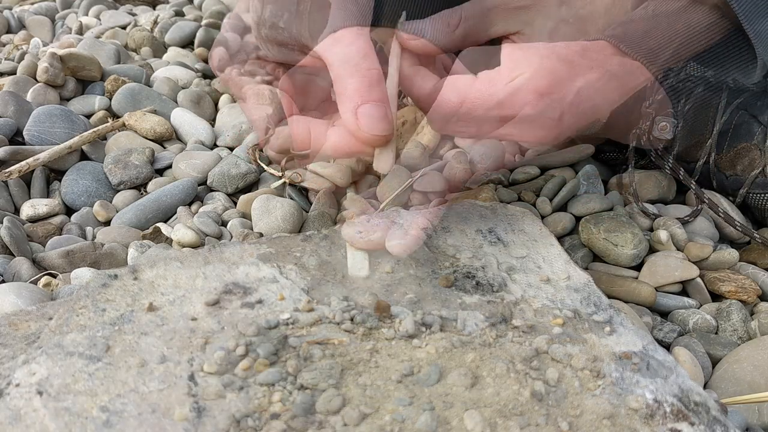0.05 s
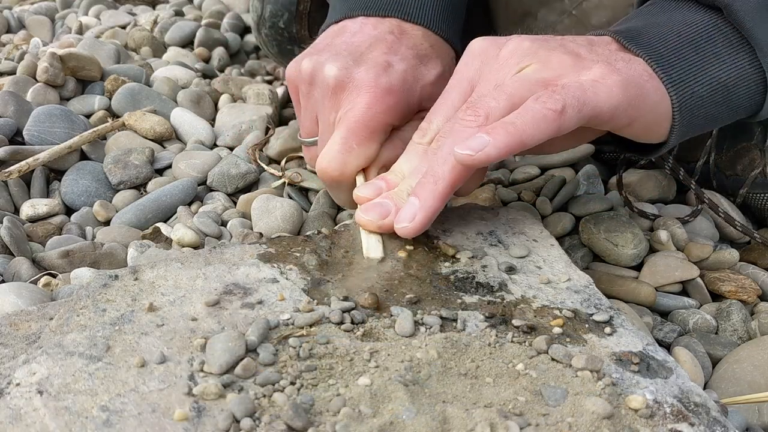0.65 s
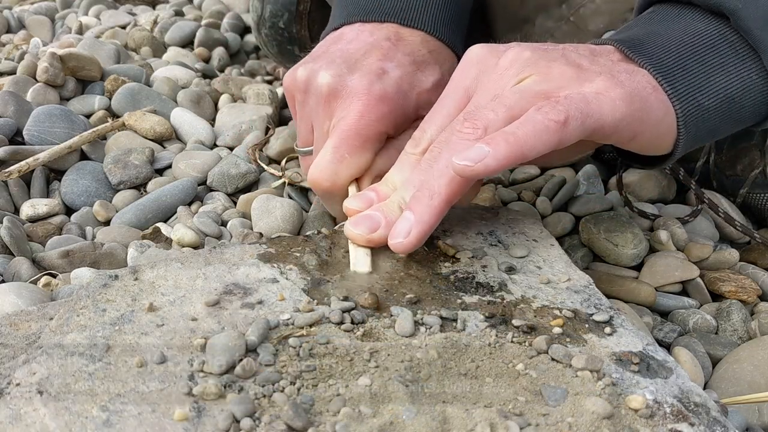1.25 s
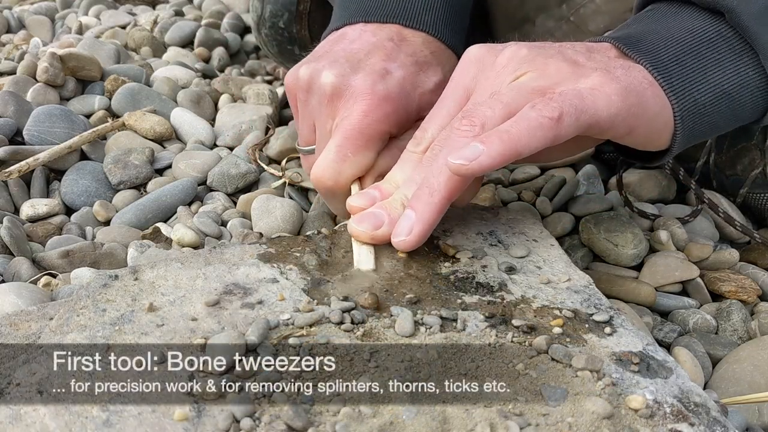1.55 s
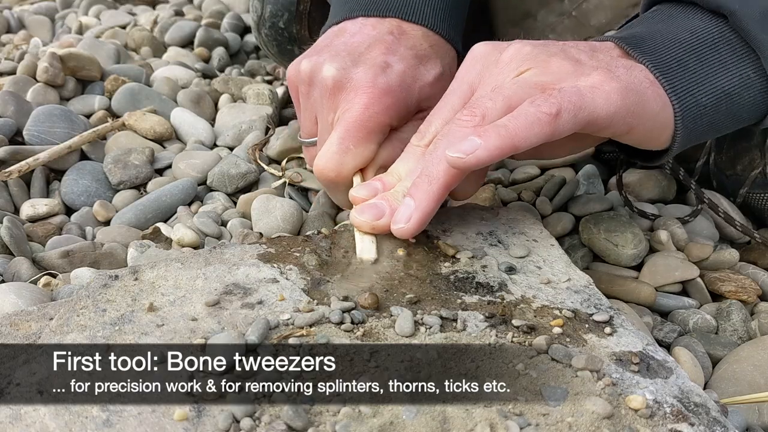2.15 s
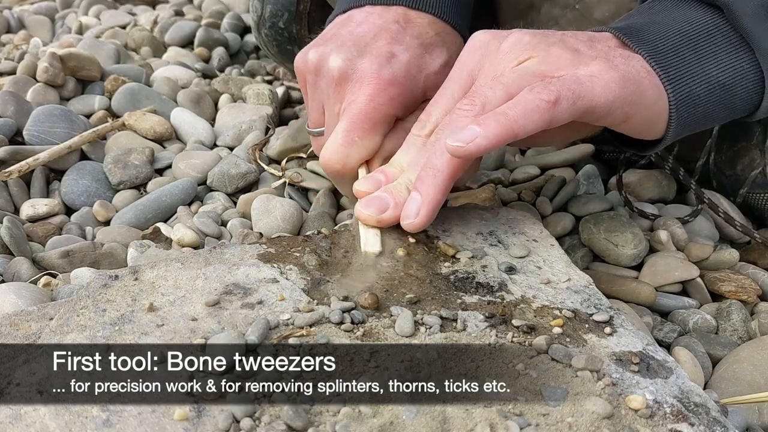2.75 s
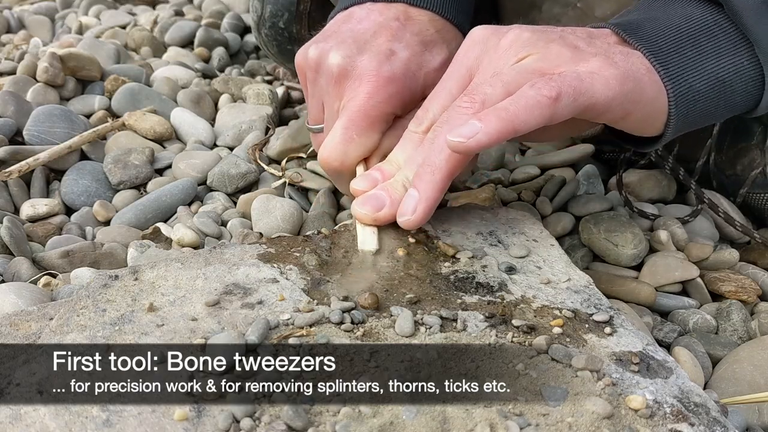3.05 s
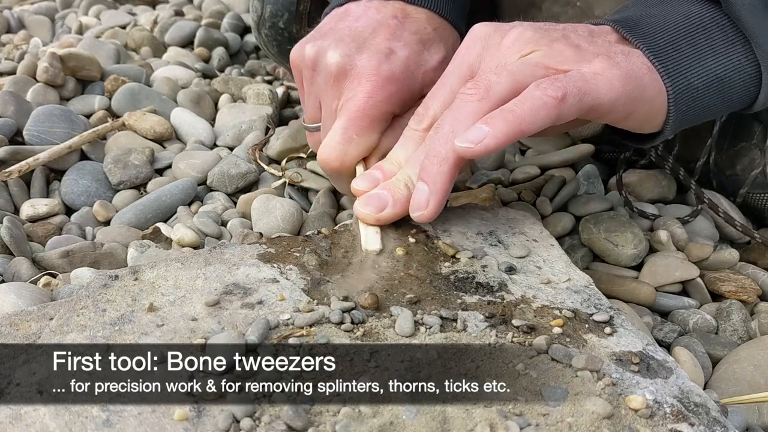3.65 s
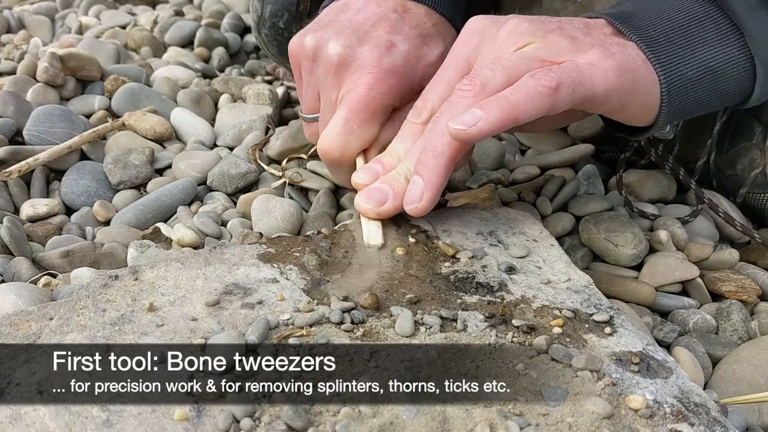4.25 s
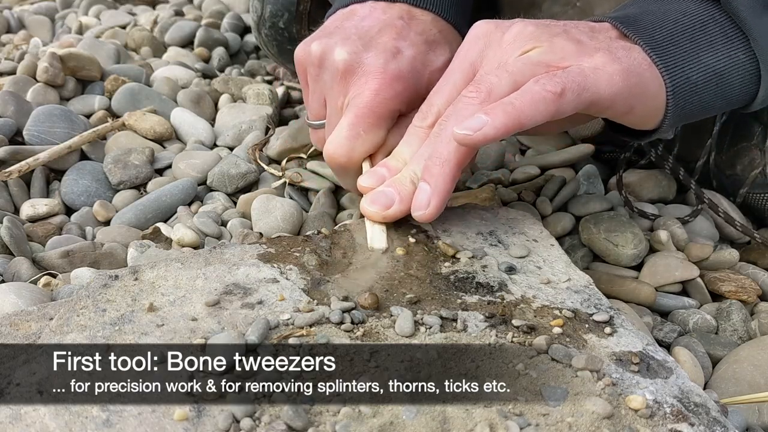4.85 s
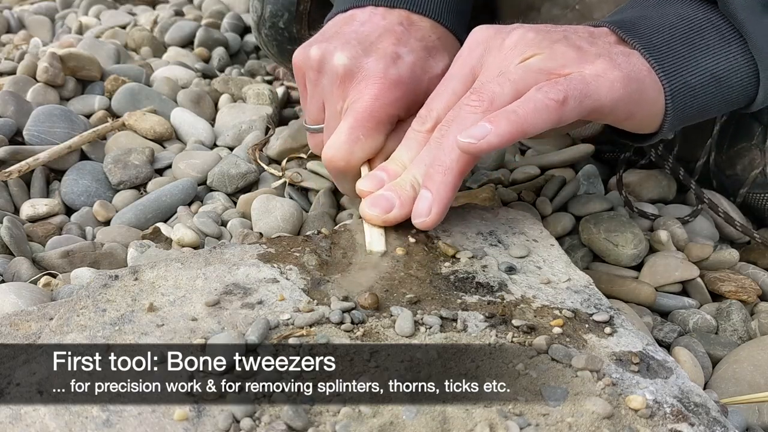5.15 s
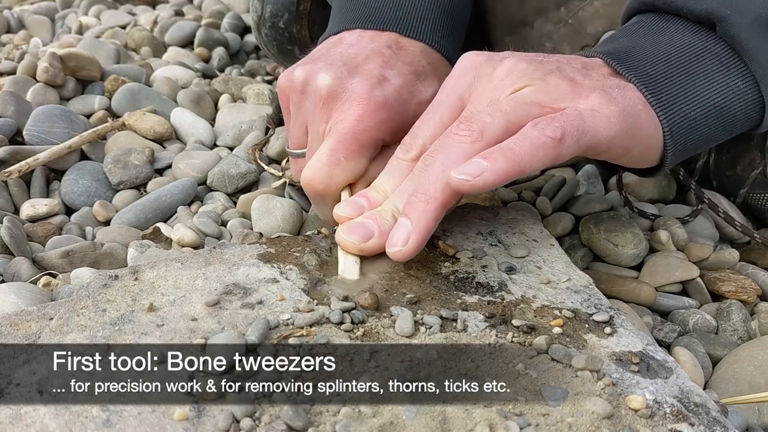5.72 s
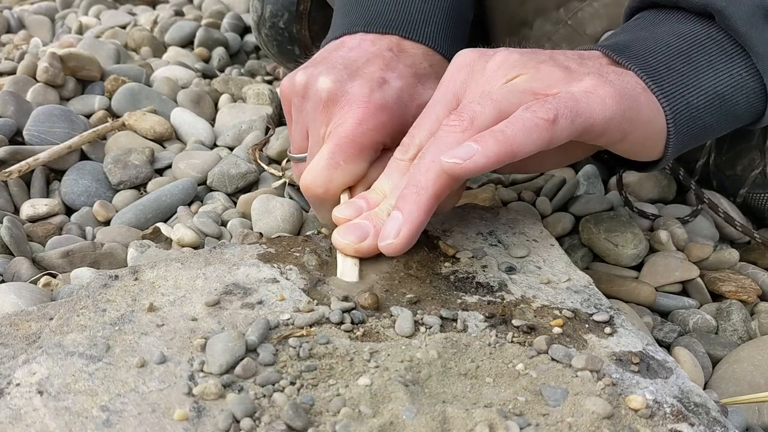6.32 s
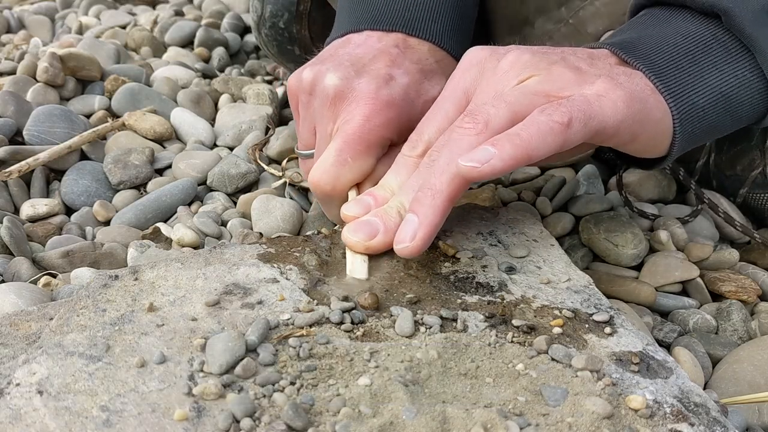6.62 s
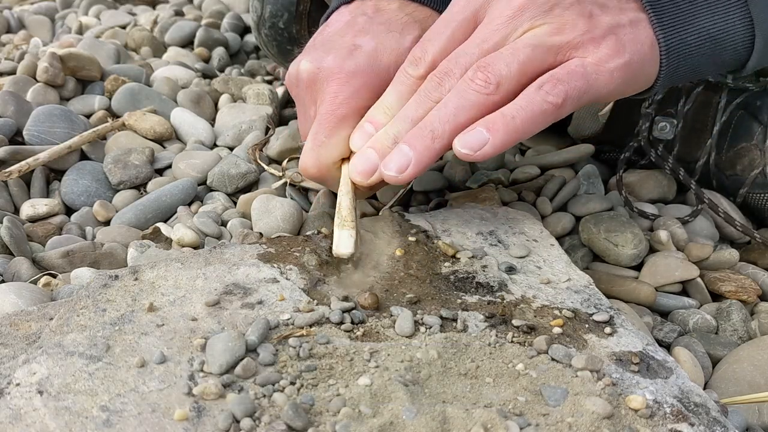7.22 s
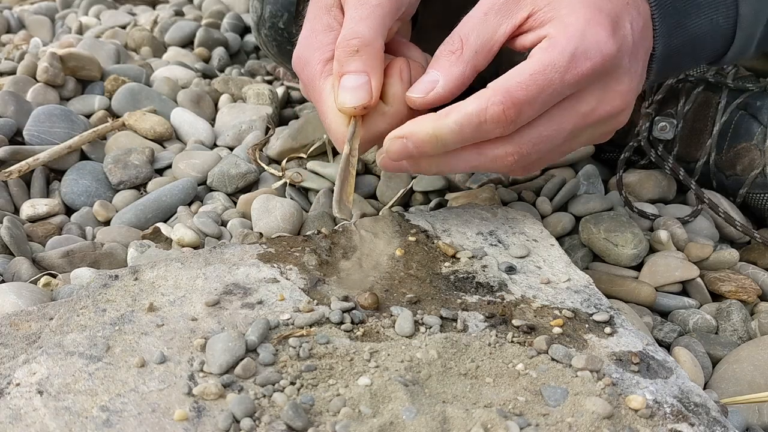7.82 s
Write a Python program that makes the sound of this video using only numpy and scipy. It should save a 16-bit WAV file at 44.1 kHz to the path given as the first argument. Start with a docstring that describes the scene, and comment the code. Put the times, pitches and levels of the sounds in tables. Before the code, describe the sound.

A piece of bone grinds back and forth on wet stone in fast, gritty rasping strokes, then lifts off with a few ticks.

```python
"""On a pebble shore, a sliver of bone is ground back and forth on a wet, flat stone.
Each stroke, six or seven a second, drags the tip over countless sand grains; now and then a coarse
grain catches and cracks. Bone and stone ring, and hands and pebbles scatter the sound, heard close
up in stereo. At the end the bone is lifted with a few ticks, the fingers slide off and the hands
bump softly. A low outdoor rumble and a faint hiss lie under it all."""
import sys
import numpy as np
from scipy import signal
from scipy.fft import rfft, irfft
from scipy.io import wavfile

SR = 44100
rng = np.random.default_rng(int(sys.argv[2]) if len(sys.argv) > 2 else 0)


def dump_mix(stems):
    """Bounce the given channels to the path in sys.argv[1] as a 16-bit WAV at rate SR."""
    frames = np.atleast_2d(stems).T  # one column per channel
    limited = np.clip(frames, -1, 1)  # hard clip at full scale
    pcm = np.round(limited * 32767).astype(np.int16)
    wavfile.write(sys.argv[1], SR, pcm)


N = 356283

# how loud the deep rumble and the drone above it are (time [s], level [dB])
RUMBLE_LEVELS = [(0.1, -71.5), (5.97, -65.5), (6.48, -72.5), (7.45, -62.5), (7.93, -75.5), (8.0, -63)]
DRONE_LEVELS = [(0.0, -70), (0.61, -60), (1.84, -58.5), (2.5, -65.5), (3.28, -62), (4.28, -68),
                (5.0, -58.5), (5.1, -67.5), (5.98, -62), (6.22, -67), (6.61, -56), (7.35, -65)]
# tone colour, or mix of lows and highs, of each steady noise (frequency [Hz], level [dB])
RUMBLE_COLOUR = [(10, -48), (30, -27.5), (45, -10.5), (68, 2.5), (95, 1), (130, 1), (190, -20.5),
                 (500, -73.5)]
DRONE_COLOUR = [(100, -23), (160, -7), (200, 0.5), (265, -3.5), (320, -14.5), (380, -24.5), (600, -58)]
HISS_COLOUR = [(100, 2), (400, 5.5), (800, 2), (1600, -2), (7000, -5), (10500, -7.5), (14400, -5.5),
               (16000, -14.5)]
# dull bumps as the hands shift their hold (time [s], frequency [Hz], level [dB])
HAND_BUMPS = [(7.45, 213.6, -54), (7.55, 75, -62.5), (8.019, 106, -61.5)]
# fingers sliding off the bone (time [s], level [dB])
SLIDE_LEVELS = [(7.15, -65.5), (7.195, -57), (7.222, -49.5), (7.245, -58.5), (7.31, -57.5), (7.4, -66),
                (7.55, -89)]
# tone colour of that slide (frequency [Hz], level [dB])
SLIDE_COLOUR = [(400, -17.5), (1500, -10), (2400, -5), (4500, -7.5), (7000, -7), (12000, -8), (16000, -1.5)]
# ticks as the bone leaves the stone (time [s], level [dB])
LIFT_TICKS = [(7.020, -30), (7.047, -41), (7.098, -44), (7.222, -32)]
# echoes off hands and pebbles, against the direct sound (frequency [Hz], level [dB])
ECHO_COLOUR = [(400, -13), (1000, -12.5), (2000, -4), (3500, 4.5), (5000, -1), (8000, 2.5), (15000, 6)]
# tone colour of bone scraping on stone (frequency [Hz], level [dB])
SCRAPE_COLOUR = [(100,-38),(250,-22),(400,-25),(550,-13.5),(800,-14),(1500,-13),(2500,-7),(4000,-13.5),(6000,-11.5),(8000,-6),(11000,-8.5),(14000,-5),(15700,-13.5)]
# pitches at which bone and stone ring (frequency [Hz], width [Hz], left [dB], right [dB])
RESONANCES = [(1054,109,6.5,7),(1902,226,4.5,7),(2266.3,72,9,6),(2690,79,3,-7),(3205,780,6.5,3),(4160,568,9,2.5),(5360,560,6.5,5),(6604,570,3,7.5),(7180,180,10.5,-1.5),(8340,740,1.5,0.8),(9240,450,7.5,-9.5),(9460,160,-12.5,5),(10090,940,4,-1),(11830,570,6,2.5),(13130,440,4,-1.5)]
# cracks of coarse grains, and a few ticks as the tip catches a grain early in a stroke or just before a pull
# stops; "body" boosts the lower tones (time [s], level [dB], body [dB])
GRAINS = [(0.1204, -21, -11), (0.408, -21, -7), (0.4248, -23.5, -5), (1.0301, -20.5, -8.5),
          (1.4562, -18.0, -10.5), (1.5826, -21, -6.5), (1.618, -12.5, -12), (1.8444, -32.1, -2),
          (2.0399, -16.5, -14), (2.0469, -17, -20), (2.1915, -17.5, -3), (2.3405, -24.6, 0),
          (2.6953, -22.9, -10), (3.0316, -21.5, -5), (3.3385, -20.5, -12.5), (3.4073, -33, -10.5),
          (3.5989, -15, -8), (3.8916, -13.6, -3.5), (3.9003, -19.5, -10), (4.2059, -17, -18),
          (4.464, -30.5, -9), (4.5396, -16, -30), (4.6998, -23.5, 5), (4.8371, -19.5, -15.5),
          (5.1565, -20, -13), (5.3635, -21, 2.5), (5.6362, -19, -17), (5.8257, -14.5, -22),
          (5.9564, -27, -12), (6.1482, -20.5, -20), (6.328, -16, -5.5), (6.6745, -24, -5),
          (6.7255, -18, 5.5), (6.7772, -12, -19), (6.9158, -20.5, 0), (6.9716, -31.5, -10)]
# leaning on the bone brings out the stone's body (time [s], body [dB])
HAND_PRESSURE = [(0.1, 5), (1.7, 1.5), (2.15, 0), (5.6, -0.3), (6.3, 1.5), (6.67, 5.5)]
# pulls and pushes in turn, a pull first (start [s], length [s], level [dB])
STROKES = [(-0.079, 0.127, -42), (0.055, 0.162, -39.5), (0.208, 0.1179, -37.5), (0.335, 0.16, -34.5),
           (0.477, 0.1226, -36), (0.611, 0.1506, -31.5), (0.733, 0.1687, -36), (0.917, 0.2, -33),
           (1.086, 0.15, -35.0), (1.243, 0.1634, -32.5), (1.39, 0.14, -34.0), (1.53, 0.17, -30.5),
           (1.69, 0.1312, -31.5), (1.826, 0.17, -30), (1.988, 0.123, -34.5), (2.111, 0.17, -32.5),
           (2.245, 0.14, -35.5), (2.391, 0.15, -31.5), (2.535, 0.13, -34), (2.659, 0.17, -32.5),
           (2.805, 0.1338, -36.0), (2.943, 0.17, -33), (3.083, 0.15, -35.0), (3.223, 0.19, -33),
           (3.379, 0.13, -36.0), (3.527, 0.17, -32.5), (3.683, 0.122, -36), (3.819, 0.15, -33.5),
           (3.966, 0.14, -34), (4.126, 0.17, -33), (4.286, 0.1604, -35.5), (4.449, 0.16, -32.5),
           (4.603, 0.14, -37), (4.751, 0.17, -32), (4.912, 0.1437, -35.5), (5.075, 0.1524, -33),
           (5.214, 0.1675, -34.0), (5.382, 0.21, -32.0), (5.579, 0.14, -32), (5.732, 0.181, -34.5),
           (5.911, 0.13, -34), (6.06, 0.15, -32.5), (6.23, 0.14, -34.5), (6.37, 0.18, -33),
           (6.543, 0.14, -33.0), (6.676, 0.18, -31.5), (6.842, 0.14, -37), (6.991, 0.1524, -55)]
# a push fades away; a pull stops abruptly; "rasp" boosts the harsh middle tones
# (fastest point [share of length], rise steepness, fall steepness, body [dB], rasp [dB])
PUSH = (.45, 1.99, 5.26, 6.5, 0.82)
PULL = (.49, 4.04, 0.63, 3.6, 2.8)

TREBLE_LIMIT_HZ = 15900


def undb(db):
    """Turn decibels into a factor to multiply a sound by."""
    return 10 ** (np.asarray(db) / 20)


def unit(x):
    """Scale a sound to an average strength (rms) of 1."""
    return x / np.sqrt(np.mean(x ** 2) + 1e-18)


def curve(rows):
    """Join (time, value) rows with straight lines, one value a sample."""
    return np.interp(np.arange(N) / SR, *np.transpose(rows))


def colour_db(colour, hz):
    """Read a colour table's level at any frequency, along an axis of octaves."""
    table_hz, db = np.transpose(colour)
    return np.interp(np.log(hz + 1), np.log(table_hz), db)


def coloured_noise(colour):
    """Two separate noises with the same tone colour."""
    gains = undb(colour_db(colour, np.fft.rfftfreq(N, 1 / SR)))
    return irfft(rfft(rng.standard_normal((2, N))) * gains, N)


def noise_burst(age, decay_s, shape):
    """A puff of noise that dies away, with an energy of about 1 a channel."""
    return unit(rng.standard_normal(shape) * np.exp(-age / decay_s)) / np.sqrt(len(age))


def wander(rate_hz, count):
    """A random drift of about 1 up or down, turning rate_hz times a second."""
    place = np.arange(count) * rate_hz / SR
    return np.interp(place, np.arange(count), rng.standard_normal(count)) * np.sqrt(3 / 2)


def peak(hz, centre, width):
    """The hump a resonance makes in the spectrum, 1 at its centre."""
    return 1 / (1 + (2 * (hz - centre) / width) ** 2)


def quickest_ring(db):
    """The fastest-fading sound that has this spectrum (minimum phase)."""
    cepstrum = irfft(np.log(undb(db)))
    half = cepstrum.shape[-1] // 2
    cepstrum[..., 1:half] *= 2
    cepstrum[..., half + 1:] = 0
    return irfft(np.exp(rfft(cepstrum)))


def add(out, sound, start):
    """Mix in a stereo sound, beginning at sample number start."""
    first, last = max(start, 0), min(start + sound.shape[1], N)
    if last > first:
        out[:, first:last] += sound[:, first - start:last - start]


def rumble(colour, db, width_db, left_db, flutter_db=2.0, flutter_hz=18):
    """Low noise with a fluttering level, spread between left and right."""
    middle, side = coloured_noise(colour)
    left_right = np.array([[1], [-1]])
    noise = unit(middle) + left_right * undb(width_db) * unit(side)
    return noise * undb(db + flutter_db * wander(flutter_hz, N) + left_right * left_db)


def outdoors(hiss_db=-70):
    """A wide, deep rumble, a narrower drone above it and a faint, even hiss."""
    deep = rumble(RUMBLE_COLOUR, curve(RUMBLE_LEVELS), width_db=-3, left_db=-1.0)
    drone = rumble(DRONE_COLOUR, curve(DRONE_LEVELS) + 0.5, width_db=-12.5, left_db=0.65)
    return deep + drone + undb(hiss_db) * unit(coloured_noise(HISS_COLOUR))


def hand_bumps(swell_s=0.038, width=0.51, size=16384):
    """Each shift of the hands makes a short swell of low noise."""
    t, hz = (np.arange(size) - size // 2) / SR, np.fft.rfftfreq(size, 1 / SR)
    swell = np.exp(-(t / swell_s) ** 2)
    out = np.zeros((2, N))
    for time_s, centre_hz, db in HAND_BUMPS:
        band = peak(hz, centre_hz, width * centre_hz) ** 2
        thud = unit(irfft(rfft(rng.standard_normal((1, size))) * band))
        add(out, undb(db) * thud * swell, int(time_s * SR) - size // 2)
    return out


def ring(body_db, body_hz, rasp_db=0, detune=0, rasp_hz=2700, rasp_width_hz=2200, size=1024):
    """How bone and stone ring, left and right, after one tiny knock from a grain."""
    hz = np.fft.rfftfreq(size, 1 / SR)
    rasp = rasp_db * peak(hz, rasp_hz, rasp_width_hz)
    body = body_db / (1 + (hz / body_hz) ** 4)
    db = colour_db(SCRAPE_COLOUR, hz) + rasp + body
    for centre, width, *sides_db in RESONANCES:
        db = db + np.outer(sides_db, peak(hz, centre * (1 + detune), width))
    ringing = quickest_ring(db - 40 * (hz > TREBLE_LIMIT_HZ + 500))
    return ringing / np.sqrt(np.sum(ringing ** 2) / 2)


def radiate(force, ringing, near_s=0.0011, far_s=0.0023, far_db=-16, right_lag_samples=4, size=2048):
    """A force sets the stone ringing; the sound arrives directly, then as a spray of random echoes."""
    age, hz = np.arange(size) / SR, np.fft.rfftfreq(size, 1 / SR)
    near, far = (rfft(noise_burst(age, decay_s, (2, size))) for decay_s in (near_s, far_s))
    echo_gain = undb(colour_db(ECHO_COLOUR, hz))
    direct = np.exp(-2j * np.pi * np.outer([0, right_lag_samples], hz) / SR)
    paths = (direct + echo_gain * near) / np.sqrt(1 + echo_gain ** 2) + undb(far_db) * far
    echoing_ring = irfft(rfft(ringing, size) * paths)[:, :size * 3 // 4]
    return signal.fftconvolve(force[None], echoing_ring, axes=1)


def lift_off(rough_db=2.0, rough_hz=130):
    """Skin slides softly along the bone, which ticks as it leaves the stone."""
    skin = unit(coloured_noise(SLIDE_COLOUR))
    out = skin * undb(curve(SLIDE_LEVELS) + rough_db * wander(rough_hz, N))
    for time_s, db in LIFT_TICKS:
        tick = radiate(np.ones(1), ring(body_db=2, body_hz=4000))
        add(out, undb(db) * tick, int(time_s * SR))
    return out


def stroke_plan():
    """Each row of STROKES with its PULL or PUSH settings attached."""
    return [(*row, PUSH if i % 2 else PULL) for i, row in enumerate(STROKES)]


def stray_grains(above_db=6.5, spread_db=0.5, reach=.11, body_db=-5, per_stroke=2):
    """List the lesser grains that crack near the fastest part of each stroke."""
    rows = []
    for start, length_s, db, (fastest, *_) in stroke_plan():
        for place, strength in np.clip(rng.standard_normal((per_stroke, 2)), -2, 2):
            time_s = start + length_s * (fastest + reach * place)
            rows.append((time_s, db + above_db + spread_db * strength, body_db))
    return rows


def tip_catches(pull_s=.033, push_s=.02, early_s=0.016, start_db=-7, stop_db=-1, spread_db=3, body_db=-7):
    """List the dry ticks as the tip catches a grain early in each stroke and just before a pull stops."""
    starts = [(start + (push_s if i % 2 else pull_s), db + start_db)
              for i, (start, _, db) in enumerate(STROKES)]
    stops = [(start + length_s - early_s, db + stop_db) for start, length_s, db in STROKES[::2]]
    return [(time_s, db + spread_db * rng.standard_normal(), body_db) for time_s, db in starts + stops]


def grain_cracks(lead_in_db=-12, lead_in_s=.0031, crumble_db=-6, crumble_s=.0046, brittle_db=-20):
    """Coarse grains crack: a faint noise swells just before each sharp click, then crumbles away."""
    size = 256
    out, age = np.zeros((2, N)), np.arange(size) / SR
    for time_s, db, body_db in list(GRAINS) + stray_grains() + tip_catches():
        lead_in = noise_burst(age, lead_in_s, size)[::-1]  # reversed, so it builds up
        crumble = noise_burst(age, crumble_s, size)
        snap = max(1, undb(db - brittle_db))  # the biggest grains break cleanest
        force = np.concatenate([undb(lead_in_db) * lead_in, [snap], undb(crumble_db) * crumble])
        force *= np.sqrt(SR / 1000) / np.linalg.norm(force)  # as much energy as 1 ms at strength 1
        crack = radiate(force, ring(body_db, body_hz=5000), near_s=0.00069)
        add(out, undb(db + 1.5) * crack, int(time_s * SR) - size)
    return out


def crunch(drive, cracks_per_s=130, size_db=2, spread_db=2.0, crumble_s=0.00039, size=128):
    """Medium grains crumble at random, loudest where the tip scrapes hardest."""
    count = len(drive)
    hits = rng.random(count) < cracks_per_s / SR
    sizes = undb(size_db + spread_db * np.minimum(rng.exponential(size=count), 3))
    cracks = hits * sizes * drive ** 0.81
    fade = np.exp(-np.arange(size) / SR / crumble_s)
    energy = signal.fftconvolve(cracks ** 2, fade)[:count]
    return np.sqrt(np.abs(energy)) * rng.standard_normal(count)


def sand(speed, peak_grains_per_s=5000, spread_db=3.0, rub_db=-2, crisp_hz=2500):
    """Wet paste rubs with a dense hiss; loose grains add tiny bright clicks, most weak, a few strong."""
    count = len(speed)
    hits = rng.random(count) < peak_grains_per_s / SR * np.sqrt(speed)
    sizes = undb(spread_db * np.minimum(rng.exponential(size=count), 6))
    clicks = unit(hits * sizes * rng.choice([-1, 1], count))
    crisp = signal.lfilter(*signal.butter(1, crisp_hz, "high", fs=SR), clicks)
    return unit(crisp + undb(rub_db) * rng.standard_normal(count))


def grinding(judder_db=2, judder_hz=300, patch_db=1.46, patch_hz=60, sand_db=-1, usual_db=-33.5, spots=7):
    """The tip speeds up and slows down; the faster it goes, the more grains it hits, and the harder."""
    out = np.zeros((2, N))
    for start, length_s, db, (fastest, rise, fall, body_db, rasp_db) in stroke_plan():
        length = int(length_s * SR)
        travel = np.interp(np.arange(length) / length, [0, fastest, 1], [0, .5, 1])
        speed = np.maximum(np.sin(np.pi * travel), 1e-6)
        drive = speed ** np.where(travel < .5, rise, fall)
        body_db += np.interp(start, *np.transpose(HAND_PRESSURE))
        body_db += 0.5 * (db - usual_db)  # louder strokes sound fuller
        rasp_db += rng.standard_normal()
        # the tip judders quickly and crosses smoother and rougher patches
        bite = unit(undb(judder_db * wander(judder_hz, length) + patch_db * wander(patch_hz, length)))
        force = (sand(speed) * bite * drive * undb(sand_db) + crunch(drive)) * undb(db)
        # each spot along the way rings a little differently and has its own echoes
        spot = np.round(travel * (spots - 1) + rng.random(length) - .5)
        for k in range(spots):
            ringing = ring(body_db, body_hz=1400, rasp_db=rasp_db, detune=0.033 * rng.standard_normal())
            add(out, radiate(force * (spot == k), ringing), int(start * SR))
    return out


def scene():
    """Mix the grinding, its cracks, the lift at the end and the open air."""
    return grinding() + grain_cracks() + lift_off() + hand_bumps() + outdoors()


def record(dry):
    """Cut off the very highest treble."""
    return signal.sosfilt(signal.ellip(10, .2, 70, TREBLE_LIMIT_HZ, fs=SR, output="sos"), dry)


dry = scene()
out = record(dry)
dump_mix(out)
```